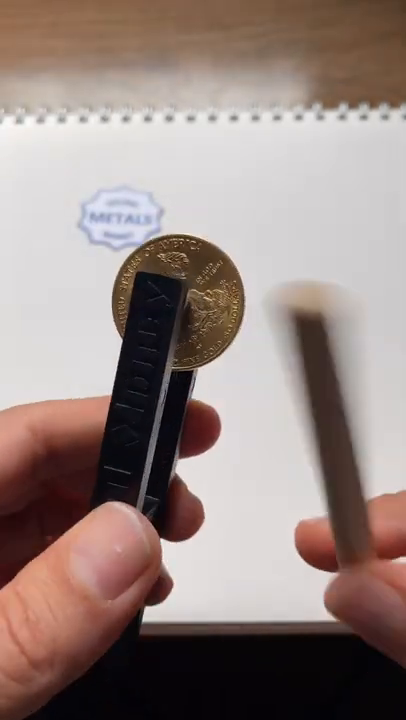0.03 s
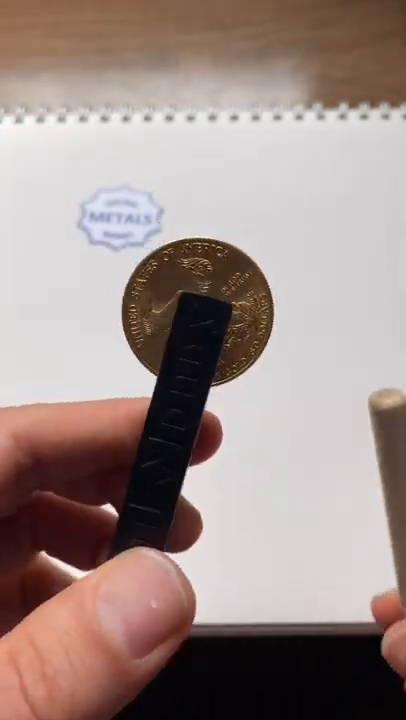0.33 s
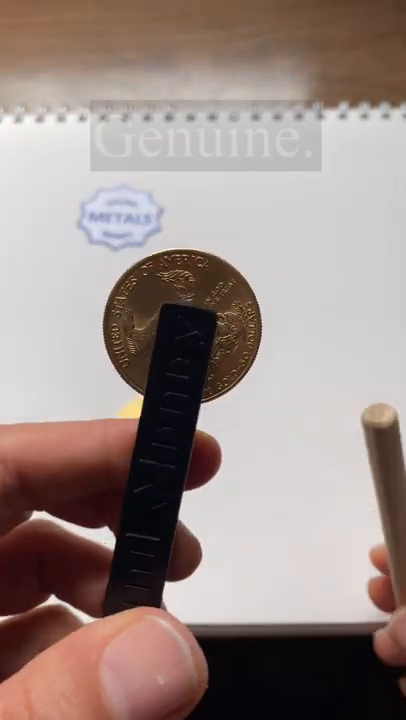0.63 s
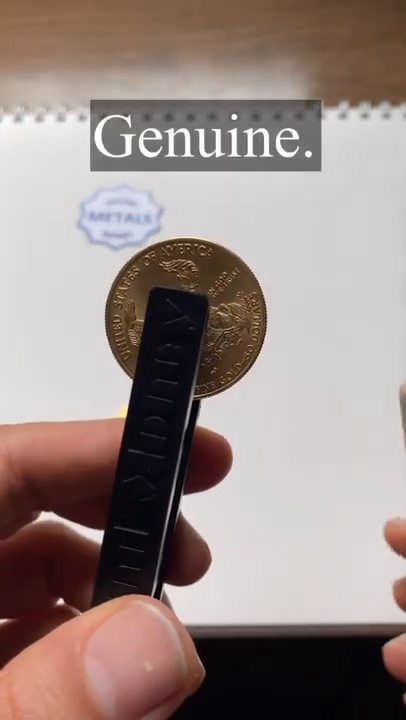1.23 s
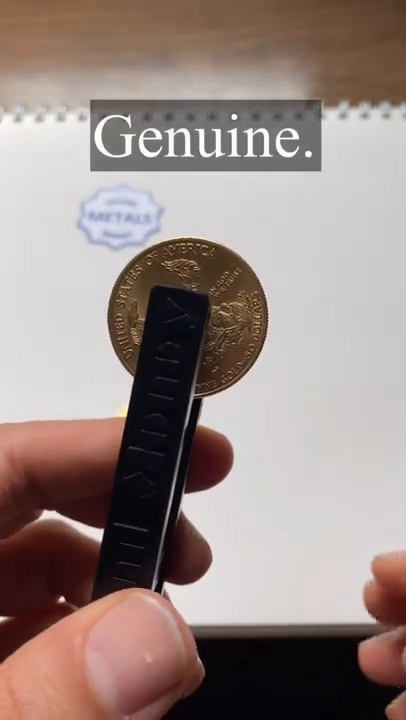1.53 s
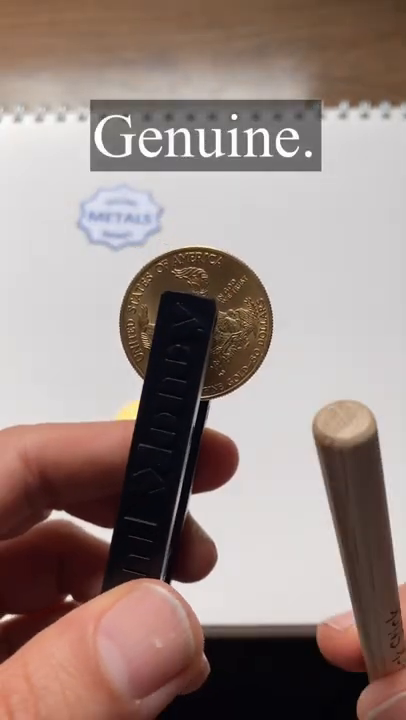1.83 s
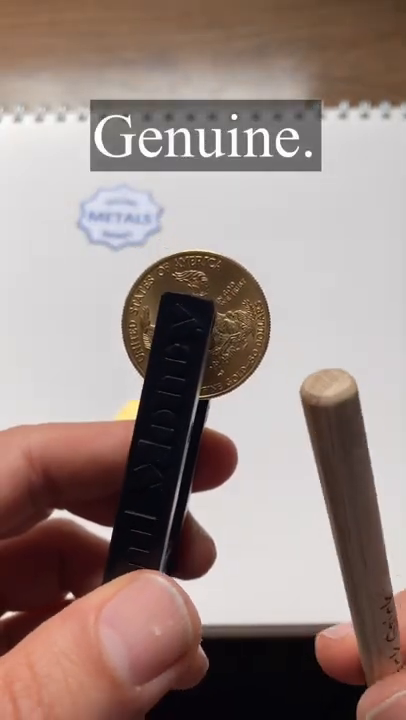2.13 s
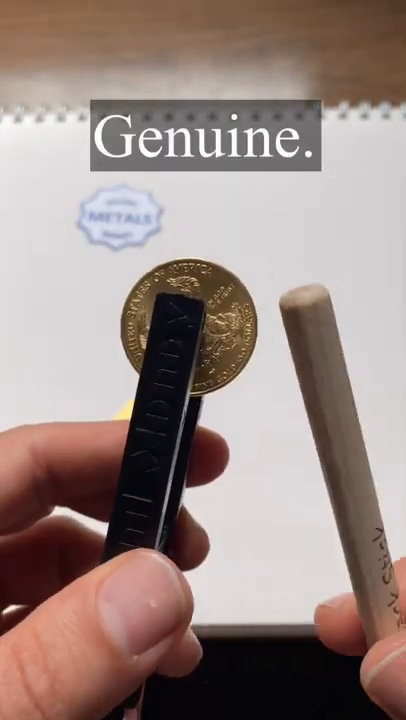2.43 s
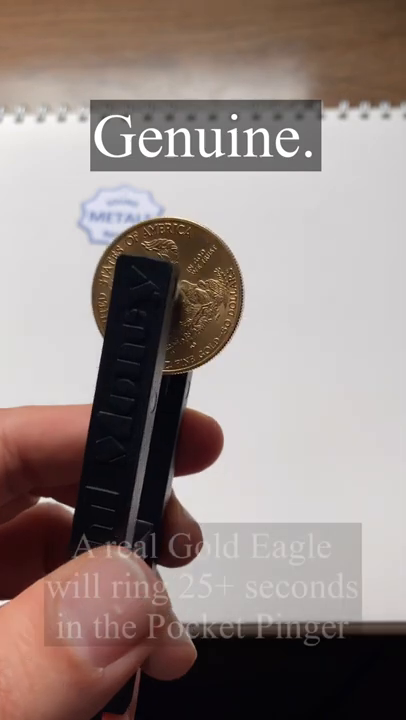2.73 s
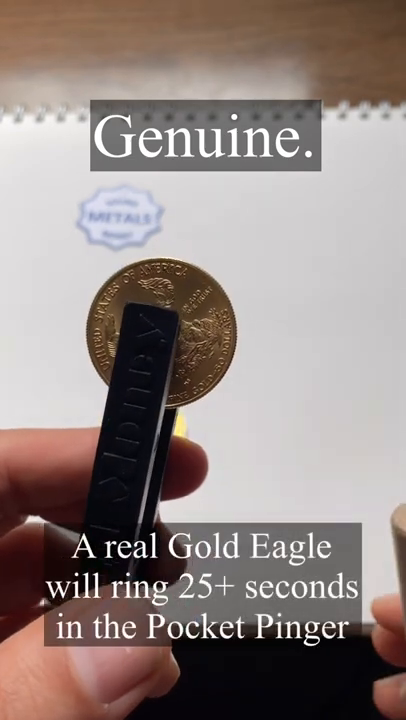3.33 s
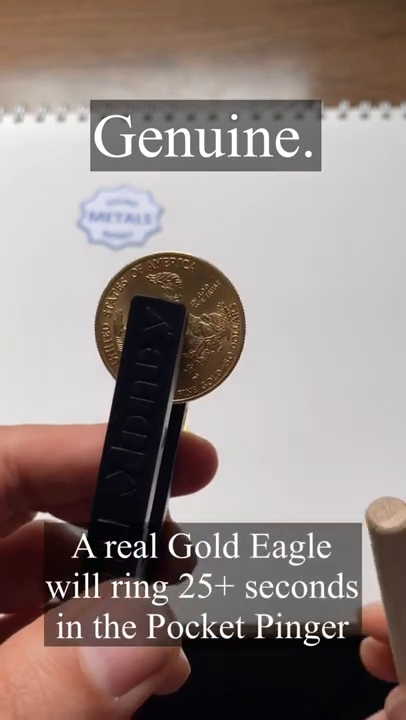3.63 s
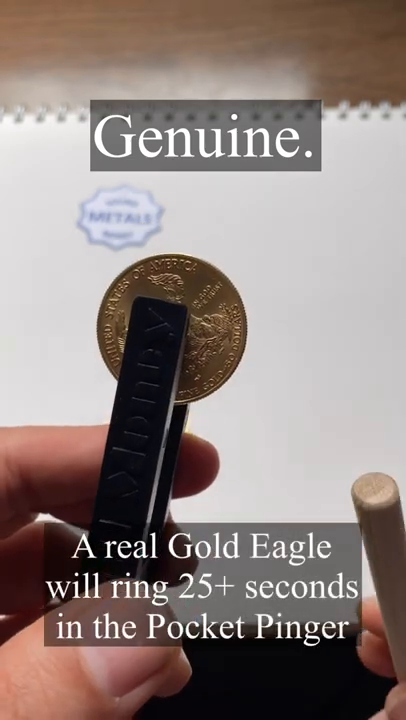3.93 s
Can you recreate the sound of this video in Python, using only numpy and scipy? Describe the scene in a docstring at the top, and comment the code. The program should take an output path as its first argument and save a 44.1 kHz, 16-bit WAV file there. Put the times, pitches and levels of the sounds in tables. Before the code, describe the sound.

Close up in a small room, a wooden stick clacks against a coin, which rings in two thin, high, wavering tones. A second tap renews the ring more strongly, with soft hand bumps and a faint rumble beneath.

```python
"""A gold coin, clamped at its centre in plastic tongs, is tapped twice with a wooden stick,
close to a phone's two microphones in a small room. Each tap is a clack of stick and tongs with a
low thump; then the coin rings on in two high modes, the upper one beating. The hand sways, so the
lower mode swells and fades differently at each microphone. Soft bumps of the hands follow the taps;
behind it all lie a low room rumble, a faint hiss and two barely audible gliding tones."""
import sys
import numpy as np
from scipy import signal
from scipy.fft import rfft, irfft
from scipy.io import wavfile
from scipy.ndimage import uniform_filter1d

SR = 44100
rng = np.random.default_rng(int(sys.argv[2]) if len(sys.argv) > 2 else 0)


def generate_wav(sig):
    """Save sig (samples, or channels by samples) to the path in sys.argv[1] as 16-bit PCM at SR."""
    pcm = np.round(np.clip(np.atleast_2d(sig).T, -1, 1) * 32767).astype(np.int16)
    wavfile.write(sys.argv[1], SR, pcm)


N = 176400  # 4 s

# spectra of the room's rumble and of the hiss (frequency [Hz], relative level [dB])
RUMBLE_COLOUR = [(20, -18), (40, -9), (61, 7), (85, -1.5), (150, -9), (260, -8.5), (340, -26.5), (600, -40),
                 (1500, -61.5), (15000, -89.5)]
HISS_COLOUR = [(300, -0.5), (900, -3.5), (1500, -5), (2700, 0.5), (3600, -7.5), (5500, -21), (15000, -31.5)]
# slow drift of the rumble (time [s], relative level [dB])
RUMBLE_DRIFT = [(0, 2.5), (1.2, -2), (1.8, -1.5), (2.302, 4), (2.699, -1.5), (3.2, 3), (4, -3)]
# contacts of the stick: graze and blow, then graze, blow and rebound
# (time [s], level [dB], top clack mode [Hz], gain of the two bright modes [dB], gain of the crack [dB])
STICK_CONTACTS = [(0.0355, -22, 8880, -10, 2.5), (0.0448, 0, 9190, -3, 0), (2.6577, -16, 7700, 2, -5.5),
                  (2.6659, 0, 9525, 1, 0), (2.6958, -29, 9300, 15.5, -9)]
# spectrum of the crack of wood on metal (frequency [Hz], relative level [dB])
CRACK_COLOUR = [(300, -20.5), (750, -11.5), (1400, -18.5), (2400, -4.5), (3800, -2.5), (5400, -3.5),
                (6900, -6.5), (9000, 7.5), (10800, 3.5), (12800, -7), (14500, -19), (16000, -22.5)]
# short modes of stick and tongs (frequency [Hz], relative level [dB], t60 [s], left over right [dB])
CLACK_MODES = [(2243, -34.5, .04, -11.5), (2650, -37.5, .04, -2.5), (3649, -23.5, 0.053, -2),
               (3727, -29, .06, 3), (3808, -26.5, .05, -3), (3970, -27, .06, -5.5),
               (4224, -36.5, 0.085, -0.5), (5560, -31, 0.034, 7.5), (6290, -34, .05, 2)]
# decay of the small room (frequency [Hz], t60 [s])
ROOM_DECAY = [(150, 0.44), (800, 0.3134), (2500, 0.46), (5500, 0.2767), (9000, 0.4761), (14000, 0.29)]
# spectrum at the start of the room's tail (frequency [Hz], relative level [dB])
TAIL_COLOUR = [(80, -12.5), (400, -10), (800, 2), (2200, 0), (3500, 2.5), (6000, 6), (8200, -12.5),
               (10500, -10), (12500, -18.5), (15000, -21.5)]
# the coin's lower mode at the two microphones as the hand sways
# (time [s], left level [dB], right level [dB], phase lead of the left [rad])
LOW_MODE_SWAY = [(0.07, -49.8, -49.9, 0.3), (0.27, -39.2, -43.8, -1.0), (0.35, -45.2, -42.7, -2.8),
                 (0.59, -45.2, -44.0, -2.3), (0.67, -60.0, -43.6, -0.2), (0.75, -49.7, -41.7, 1.6),
                 (0.95, -43.6, -49.1, 2.6), (1.11, -46.9, -40.8, 3.7), (1.15, -58.1, -39.6, 3.2),
                 (1.31, -50.0, -41.4, 1.5), (1.71, -43.3, -45.7, 2.6), (1.95, -59.4, -41.9, 5.8),
                 (2.07, -46.0, -54.1, 7.1), (2.15, -45.5, -54.7, 4.1), (2.27, -45.7, -42.9, 4.1),
                 (2.35, -58.8, -57.0, 3.3), (2.47, -56.9, -43.9, 6.8), (2.63, -57.7, -50.7, 5.9),
                 (2.7, -46.9, -45.4, 7.8), (2.94, -33.7, -35.5, 8.9), (3.18, -34.5, -29.0, 10.0),
                 (3.26, -42.6, -29.1, 10.2), (3.42, -48.0, -34.0, 9.3), (3.5, -40.7, -32.3, 9.2),
                 (3.96, -40.2, -30.0, 9.1)]
# the coin's upper mode before its twin is added (time [s], level [dB])
HIGH_MODE_LEVEL = [(0.06, -42.3), (0.26, -33.5), (0.46, -44.8), (0.82, -39.5), (1.14, -44.7), (1.26, -49.1),
                   (1.34, -47.4), (1.42, -52.7), (1.54, -46.4), (2.38, -52.1), (2.5, -63.5), (2.54, -52.2),
                   (2.63, -58.9), (2.7, -36.5), (2.94, -31.5), (3.3, -33.1), (3.34, -35.4), (3.92, -37.1)]
# rings set off by the two blows (time [s], strength of the upper mode's twin [0-1])
RING_STARTS = [(0.043, .2), (2.666, .62)]
# soft bumps of the hands (time [s], level [dB], t60 [s])
HAND_BUMPS = [(0.275, -56.5, 0.52), (2.869, -49.5, 0.21), (3.509, -56, .15)]
# spectrum of a bump (frequency [Hz], relative level [dB])
BUMP_COLOUR = [(30, -21), (90, 15.5), (280, -4), (450, -18), (800, -33.5), (1500, -42), (4000, -71)]
# tones in the background (time [s], length [s], start pitch [Hz], end pitch [Hz], level [dB])
FAINT_TONES = [(0.713, 0.11, 925, 965, -82.5), (2.08, 0.39, 511, 470, -80)]

ATTACK_S, FLUTTER_HZ = 0.00078, 60.36
RUMBLE_LIKENESS = 0.87  # left-right correlation of the rumble and the bumps


def amp(db):
    """Decibels to gain."""
    return 10 ** (np.asarray(db) / 20)


def decay(t, db, t60):
    """Gain that starts at db and falls 60 dB every t60 seconds."""
    return amp(db - 60 * t / t60)


def unit_rms(x):
    """Scales to rms 1."""
    return x / np.sqrt(np.mean(x ** 2) + 1e-20)


def at_hz(table, hz):
    """Reads a table on a log-frequency axis."""
    f, value = np.transpose(table)
    return np.interp(np.log(hz + 1), np.log(f + 1), value)


def pan(db):
    """Gains that put the left microphone db above the right."""
    return amp(np.array([[db], [-db]]) / 2)


def add(mix, start_s, sound):
    """Mixes a stereo sound in at a time."""
    part = mix[:, round(start_s * SR):][:, :sound.shape[1]]
    part += sound[:, :part.shape[1]]


def noise(colour, likeness, size):
    """Coloured stereo noise of rms 1; likeness is the correlation between the microphones."""
    left, other = rng.standard_normal((2, size))
    spectrum = rfft(np.array([left, likeness * left + np.sqrt(1 - likeness ** 2) * other]))
    return unit_rms(irfft(spectrum * amp(at_hz(colour, np.fft.rfftfreq(size, 1 / SR))), size))


def waver(top_hz):
    """Random wander of rms 1 over the four octaves below top_hz."""
    t = np.arange(N) / SR
    rates = top_hz * np.geomspace(1 / 16, 1, 20)
    return unit_rms(sum(np.sin(2 * np.pi * (hz * t + rng.random())) / np.sqrt(hz) for hz in rates))


def room_tone():
    """The still room: a low rumble that wavers, with a very faint steady hiss."""
    drift_db = np.interp(np.arange(N) / SR, *np.transpose(RUMBLE_DRIFT))
    rumble_db = -68 + drift_db + 1.5 * waver(top_hz=8)
    rumble = amp(rumble_db) * noise(RUMBLE_COLOUR, RUMBLE_LIKENESS, N)
    return rumble + amp(-84.5) * noise(HISS_COLOUR, likeness=0.23, size=N)


def crack(t):
    """Wood meets metal: a sharp burst of noise with a weaker, longer rattle."""
    envelope = np.minimum(t / ATTACK_S, 1) * (decay(t, -6, t60=0.0079) + decay(t, -22.5, t60=0.051))
    burst = envelope * noise(CRACK_COLOUR, likeness=0.98, size=len(t))
    # even out the burst's chance peaks, then give it back its colour and level
    spectrum = rfft(burst)
    outline = np.sqrt(uniform_filter1d(np.mean(abs(spectrum) ** 2, axis=0), 61))
    colour = amp(at_hz(CRACK_COLOUR, np.fft.rfftfreq(len(t), 1 / SR)))
    smoothed = unit_rms(irfft(spectrum / outline * colour)) * np.std(burst)
    return smoothed * (t < t[-1] / 2)


def clack(t, top_hz, bright_db):
    """Stick and tongs ring briefly, with a dull wooden knock and two bright modes."""
    knock = [(760, -30.5, 0.018, 0)]  # columns as in CLACK_MODES
    bright = [(8180, bright_db - 14, 0.05, 0), (top_hz, bright_db - 4, 0.012, 0)]
    modes = sum(pan(side_db) * decay(t, db, t60) * np.sin(2 * np.pi * (hz * t + rng.random()))
                for hz, db, t60, side_db in CLACK_MODES + knock + bright)
    return np.minimum(t / ATTACK_S, 1) * modes


def thump(t):
    """A low thump with each tap, its pitch falling quickly as it moves from right to centre."""
    cycles = 1.1 * np.log(1 + t / 0.00052)
    envelope = (1 - np.exp(-t / 0.0022)) * decay(t, -30.5, t60=0.074)
    lean = pan(-10) ** np.exp(-t / 0.00776)
    return lean * envelope * np.sin(2 * np.pi * cycles)


def microphone_spacing(x, lag_s=0.000033):
    """The taps reach the right microphone a little later than the left."""
    delay = np.exp(-2j * np.pi * np.fft.rfftfreq(N, 1 / SR) * lag_s)
    return np.array([x[0], irfft(rfft(x[1]) * delay, N)])


def room_tail(x, rise_s=0.012):
    """The small room answers with a short diffuse tail, each band dying at its own speed."""
    hz, t, bands = signal.stft(rng.standard_normal((2, 32768)), SR, nperseg=256)
    bands = bands * decay(t, at_hz(TAIL_COLOUR, hz)[:, None], at_hz(ROOM_DECAY, hz)[:, None])
    tail = signal.istft(bands, SR, nperseg=256)[1]
    tail *= np.minimum(np.arange(tail.shape[1]) / SR / rise_s, 1)
    return signal.fftconvolve(x.mean(0)[None], tail / np.linalg.norm(tail[0]), axes=1)[:, :N]


def coin_ring(low_hz=4482.2, high_hz=10393.6, beat_hz=4.9, first_dip_s=0.045, flutter_db=0.88):
    """The coin, close up: two long modes, the upper beating against a close twin."""
    t = np.arange(N) / SR

    def glide(times, values):
        return uniform_filter1d(np.interp(t, times, values), 1500)

    times, left_db, right_db, lead = np.transpose(LOW_MODE_SWAY)
    left = amp(glide(times, left_db)) * np.exp(1j * glide(times, lead))
    right = amp(glide(times, right_db))
    low_carrier = np.exp(2j * np.pi * low_hz * t)
    low = low_carrier * np.array([left, right])
    beat = np.zeros(N, complex)
    for start, twin in RING_STARTS:  # each blow restarts the beat
        beat = np.where(t < start, beat, 1 - twin * np.exp(-2j * np.pi * beat_hz * (t - start - first_dip_s)))
    high = amp(glide(*np.transpose(HIGH_MODE_LEVEL))) * beat * np.exp(2j * np.pi * high_hz * t)
    modes = sum(amp(flutter_db * waver(FLUTTER_HZ)) * mode for mode in (low, high))
    # loud ringing adds a faint octave of the lower mode and a sum tone
    low_mono = low_carrier * np.sqrt(np.mean(abs(low) ** 2, axis=0))
    overtones = low_mono ** 2 + amp(-7.5) * low_mono * high
    onset = np.clip((t - RING_STARTS[0][0]) / ATTACK_S, 0, 1)
    return np.sqrt(2) * (modes + overtones).real * onset


def hand_bumps(rise_s=0.017):
    """Dull bumps as the hands settle after a blow."""
    out = np.zeros((2, N))
    t = np.arange(16384) / SR
    for start, db, t60 in HAND_BUMPS:
        envelope = np.minimum(t / rise_s, 1) * decay(t, db, t60)
        add(out, start, envelope * noise(BUMP_COLOUR, RUMBLE_LIKENESS, len(t)))
    return out


def faint_tones(wobble_hz=5):
    """Far in the background, two tones swell and fade, one gliding up and one down."""
    out = np.zeros((2, N))
    for start, length, start_hz, end_hz, db in FAINT_TONES:
        progress = np.linspace(0, 1, int(length * SR))
        wobble = wobble_hz * waver(FLUTTER_HZ)[:len(progress)]
        hz = start_hz + (end_hz - start_hz) * progress ** 2 + wobble
        swell = amp(db) * np.sin(np.pi * progress)
        add(out, start, pan(0) * swell * np.sin(2 * np.pi * np.cumsum(hz) / SR))
    return out


def scene():
    """Taps, coin and hands close to the microphones, with the room behind them."""
    t = np.arange(8192) / SR
    taps = np.zeros((2, N))
    for start, db, top_hz, bright_db, crack_db in STICK_CONTACTS:
        contact = amp(crack_db) * crack(t) + clack(t, top_hz, bright_db) + thump(t)
        add(taps, start, amp(db) * contact)
    taps_in_room = microphone_spacing(taps) + amp(-13.5) * room_tail(taps)
    return taps_in_room + coin_ring() + hand_bumps() + room_tone() + faint_tones()


def record(dry):
    """The phone clips at full scale and cuts the treble above 16.4 kHz."""
    lowpass = signal.firwin(511, 16400, window=("kaiser", 9), fs=SR)
    return signal.oaconvolve(np.clip(dry, -1, 1), lowpass[None], "same")


dry = scene()
out = record(dry)
generate_wav(out)
```